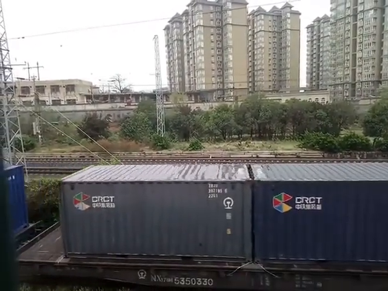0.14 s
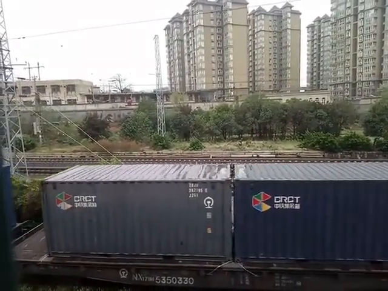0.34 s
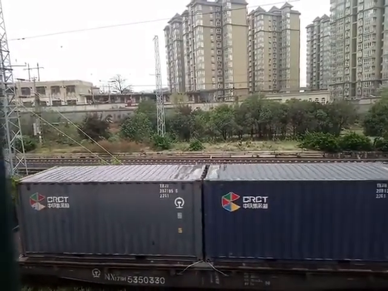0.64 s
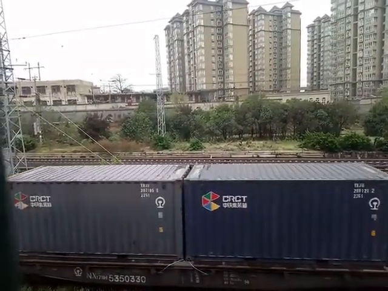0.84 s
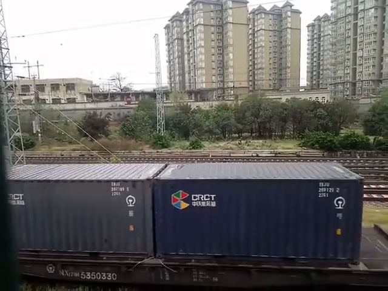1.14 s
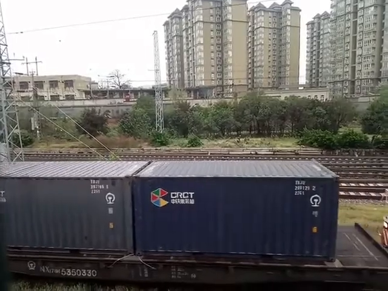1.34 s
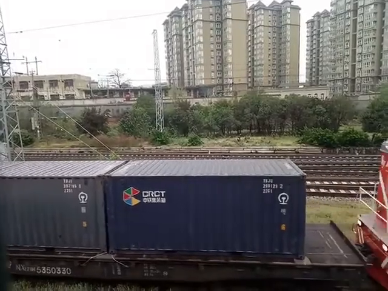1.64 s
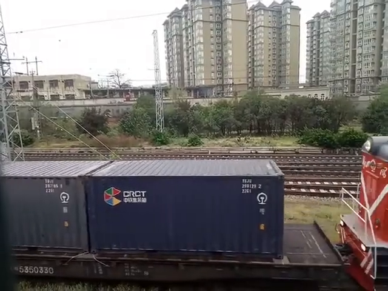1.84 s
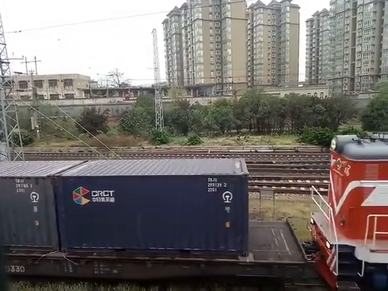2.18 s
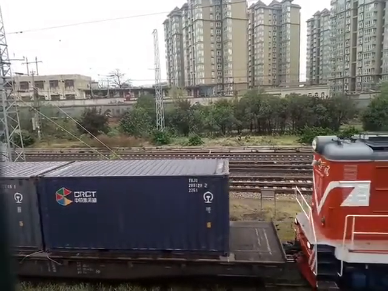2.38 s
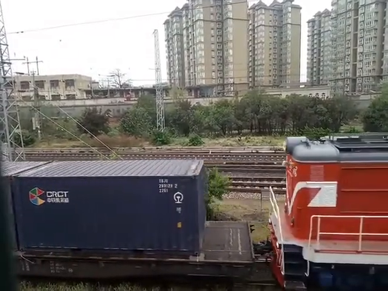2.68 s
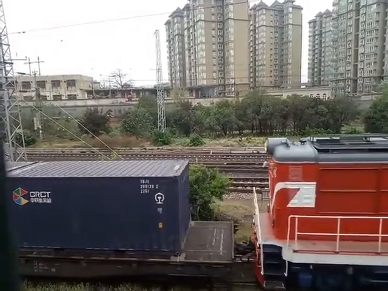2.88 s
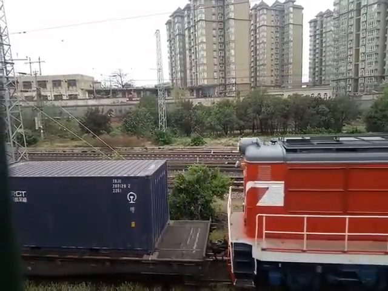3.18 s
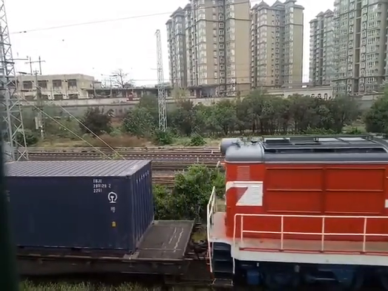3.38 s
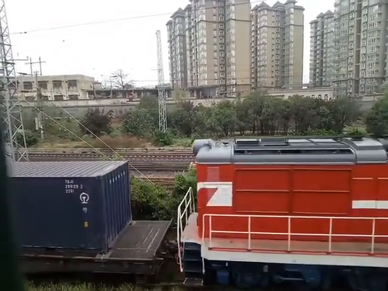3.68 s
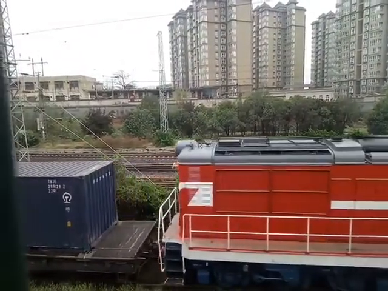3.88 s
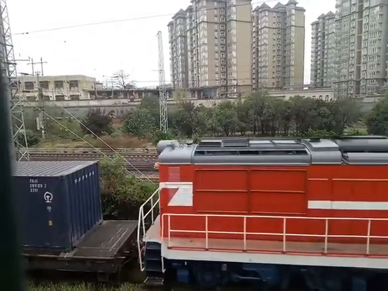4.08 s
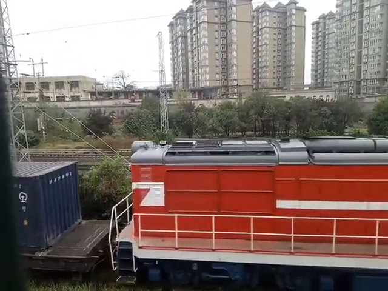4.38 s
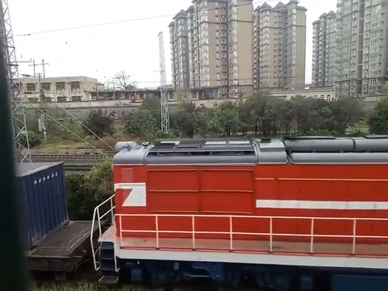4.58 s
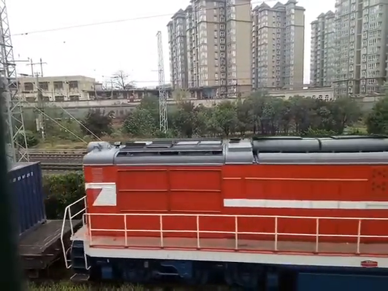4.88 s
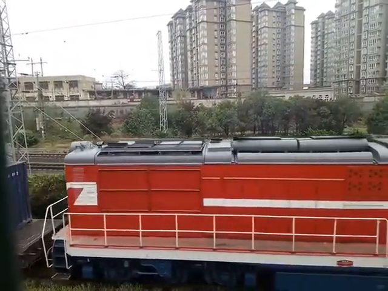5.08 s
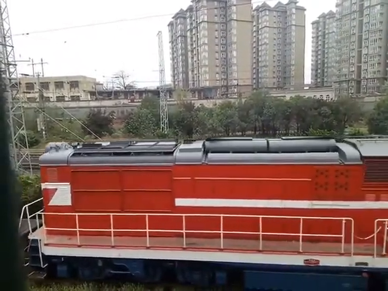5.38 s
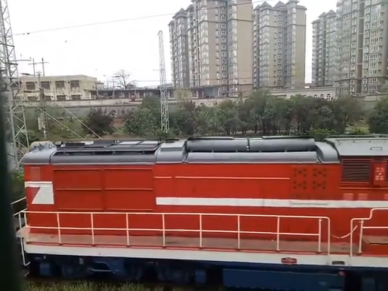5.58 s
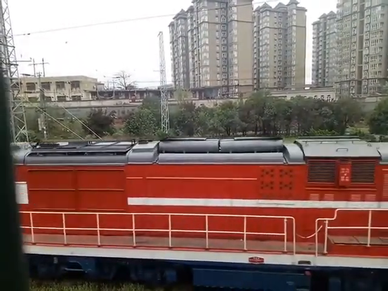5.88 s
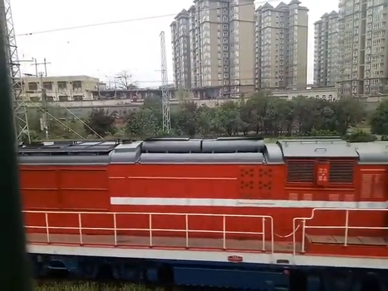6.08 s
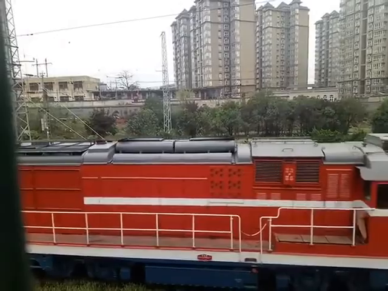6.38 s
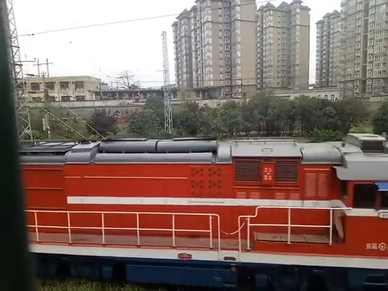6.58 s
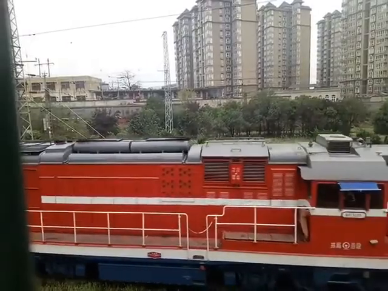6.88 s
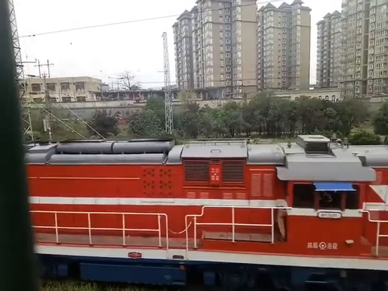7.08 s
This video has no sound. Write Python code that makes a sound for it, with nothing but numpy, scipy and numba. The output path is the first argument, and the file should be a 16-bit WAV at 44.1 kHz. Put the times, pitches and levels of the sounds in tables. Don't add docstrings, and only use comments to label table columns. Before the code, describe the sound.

From 0 s a diesel engine drones steadily nearby in an open railway yard, its rapid uneven exhaust beats throbbing about five times a second over low rolling wheel rumble. A thin, high turbocharger whistle flutters and beats continuously, with a swelling low gear hum, faint fan hum, valve clatter and ringing sheet metal. Rumble lifts around 1.6 s as a bogie passes. At about 2.9 s a coupling takes up slack with a soft scraping clank and short metallic ring. The engine comes abreast by about 5.1 s; the rumble swells there and near 6 s, while fan hum, upper whistle and exhaust hiss become clearer towards 7 s. Around 7.1 s a low horn begins and is cut short. The close phone pickup is slightly overloaded, with patchy, band-limited treble; the right channel is duller and more diffuse.

```python
import sys
import numpy as np
from scipy import signal
from scipy.fft import rfft, irfft
from scipy.io import wavfile
from scipy.ndimage import uniform_filter1d
from numba import njit

SR = 44100
rng = np.random.default_rng(int(sys.argv[2]) if len(sys.argv) > 2 else 0)


def materialize(psi):
    bounded = np.clip(np.atleast_2d(psi).T, -1, 1)
    quanta = np.round(bounded * 32767).astype(np.int16)
    wavfile.write(sys.argv[1], SR, quanta)


def volts(x):
    e = np.asarray(x, float) / 20
    return 10 ** e


N = 319284
TIME = np.arange(N) / SR
BINS = np.maximum(np.arange(N // 2 + 1) * SR / N, 1)


def curves(table):
    s, *columns = np.transpose(table)
    return [np.interp(TIME, s, c) for c in columns]


def over_hz(table):
    hz, value = np.transpose(table)
    return np.interp(np.log(BINS), np.log(hz), value)


def swells(table):
    return sum(lift_db * np.exp(-((TIME - s) / half_s) ** 2) for s, half_s, lift_db in table)


def between(pair, share):
    return pair[0] + share * (pair[1] - pair[0])


def unit(x):
    return x / np.sqrt(np.mean(x ** 2))


def walk(rate_hz):
    k = int(SR / rate_hz)
    held = np.repeat(rng.standard_normal(N // k + 1), k)
    return 1.3 * uniform_filter1d(uniform_filter1d(held, k), k)[:N]


def tone(hz, blur_hz, blur_rate, flicker_db):
    turns = np.cumsum(hz + blur_hz * walk(blur_rate)) / SR + rng.random()
    return np.sqrt(2) * volts(flicker_db * walk(blur_rate)) * np.sin(2 * np.pi * turns)


def noise(colour, flicker_db, rate):
    spectrum = rfft(rng.standard_normal(N)) * volts(over_hz(colour))
    place = 2 * np.log2(BINS)
    first, last = int(2 * np.log2(colour[0][0])), int(2 * np.log2(colour[-1][0])) + 1
    out = 0
    for k in range(first, last + 1):
        window = np.cos(np.clip(place - k, -1, 1) * np.pi / 2)
        out = out + volts(flicker_db * walk(rate)) * irfft(spectrum * window ** 2, N)
    return unit(out)


@njit
def band(x, hz, width):
    y, b, l = np.empty(len(x)), 0., 0.
    for i in range(len(x)):
        g, k = np.tan(np.pi * hz[i] / SR), width / hz[i]
        v = (b + g * (x[i] - l)) / (1 + g * (g + k))
        b, l, y[i] = 2 * v - b, l + 2 * g * v, k * v
    return y


# [f/Hz, level/dB]
RUMBLE = [(18, -8.5), (28, -17), (38, -32), (55, -12), (85, -9.5), (130, -8), (200, -3.5), (240, -7),
          (300, -7.5), (420, -13.5), (560, -27.5), (900, -49.5)]
# [t/s, half length/s, lift/dB]
BOGIES = [(1.6, 0.42, 2), (2.8, 0.21, -0.5), (5.1, 0.32, 1.5), (6.0, 0.15, 3), (6.8, 0.42, -1)]


def wheels():
    return volts(-19 + swells(BOGIES)) * noise(RUMBLE, flicker_db=1.7, rate=4.7)


# [f/Hz, level/dB]
HISS_COLOUR = [(2800, -15.5), (3150, 0.5), (3800, 5.5), (4100, 4), (4500, 3), (5200, 2), (5600, -0.5),
               (6500, 3.5), (6900, -4.5), (7150, -18), (8000, -24.5), (8700, -19), (9500, -27), (9700, -92)]


def hiss(stack, throb_db):
    return volts(between((-39, -34), stack) + 1.1 * throb_db) * noise(HISS_COLOUR, flicker_db=0.7, rate=14)


# [t/s, f/Hz, depth/0-1]
GROUND_NOTCH = [(0, 5870, 0.7), (.7, 5800, 0.8), (1.4, 5610, .75), (1.7, 5390, 0.2), (1.95, 5710, 0.6),
                (2.4, 5450, 0.4), (2.8, 5530, .6), (3.2, 5730, 0.95), (3.6, 5530, 0.9), (4.0, 5770, 0.6),
                (4.25, 5440, 0.6), (4.55, 5620, 0.5), (4.75, 5470, .8), (5.05, 5230, .6), (5.5, 5630, 0.1),
                (6.1, 5930, .55), (6.35, 5730, 0.01), (6.6, 5640, .75)]
# [f approaching/Hz, f abreast/Hz, width/Hz, depth far/0-1, depth near/0-1]
DIM_BANDS = [(6420, 6460, 190, 0.7, 0.12)]


def notched(sound, abreast, stack):
    hz, depth = curves(GROUND_NOTCH)
    sound = sound - np.clip(depth, 0, 1) * band(sound, hz * (1 + 0.028 * walk(9)), 600.)
    for far_hz, near_hz, width_hz, far, near in DIM_BANDS:
        hz = between((far_hz, near_hz), abreast) * (1 + 0.0068 * walk(3.2))
        depth = np.clip(between((far, near), stack), 0, 1)
        sound = sound - depth * band(sound, hz, 1. * width_hz)
    return sound


# [t/s, f/Hz]
GEAR_HZ = [(0, 236.2), (1.5, 239.7), (4, 243.1), (5.8, 246.2), (7.24, 245.8)]
# [t/s, half length/s, lift/dB]
GEAR_SWELLS = [(1.1, 0.45, 10), (1.6, 0.22, 5.5), (1.87, .07, -9.5), (2.1, 0.33, 12.5), (2.45, 0.042, -5.5),
               (2.65, 0.11, 3), (2.95, 0.34, 14), (3.75, 0.32, 12.5), (4.4, 0.29, 6.5), (5.75, 0.22, 10),
               (6.4, 0.44, 9), (6.95, .2, -4.5), (5.0, .3, -5), (.5, 0.27, -1.5)]


def gear():
    hum = tone(curves(GEAR_HZ)[0], blur_hz=0.3, blur_rate=5, flicker_db=0.5)
    return volts(-33.5 + swells(GEAR_SWELLS)) * hum


# [t/s, f/Hz]
FAN_HZ = [(0, 1144), (3.5, 1147), (5.5, 1145), (7.24, 1140)]
# [t/s, half length/s, lift/dB]
FAN_SWELLS = [(.08, .15, 3), (.5, .15, 3.5), (.75, 0.2, -5), (1.3, 0.075, 4.5), (1.8, .1, 1),
              (2.35, .06, 8), (2.95, .06, 3.5), (3.25, 0.055, 7), (3.65, .25, 8), (4.3, .2, 12),
              (4.85, 0.25, 10.5), (5.15, 0.11, 19), (5.5, .15, 11.5), (5.95, .08, 4.5), (6.15, .06, 11.5),
              (6.45, .15, 9), (6.75, 0.14, 12.5), (7.13, .1, 11.5)]


def fan():
    hum = tone(curves(FAN_HZ)[0], blur_hz=.8, blur_rate=12, flicker_db=1.0)
    return volts(-53.5 + swells(FAN_SWELLS)) * hum


# [f approaching/Hz, f abreast/Hz, width/Hz, level approaching/dB, level abreast/dB]
PANELS = [(2250, 2102, 270, -40, -37), (6120, 6150, 150, -47, -52.5), (1304, 1335, 23, -56, -52)]


def panels(abreast, throb_db):
    out = 0
    for far_hz, near_hz, width_hz, far_db, near_db in PANELS:
        hz = between((far_hz, near_hz), abreast)
        ring = band(band(rng.standard_normal(N), hz, 1. * width_hz), hz, 2. * width_hz)
        out = out + unit(ring) * volts(between((far_db, near_db), abreast) + throb_db + 1.9 * walk(9))
    return out


# [f/Hz, level/dB]
CLATTER_COLOUR = [(350, -26), (570, -4), (750, 0.5), (940, 1.5), (1080, -4), (1700, -12), (2700, -12.5),
                  (3100, -16), (3600, -31.5)]
# [t/s, half length/s, lift/dB]
SURGES = [(.1, 0.035, 0), (.5, .05, 4), (1.3, 0.054, 1), (2.4, 0.081, 3.5), (2.95, 0.044, 3),
          (3.3, 0.085, 0.5), (4.05, 0.045, 3), (4.4, .06, 1.5), (4.65, 0.06, 0.5), (5.15, 0.041, 1.5),
          (5.95, 0.054, 2.5), (6.25, 0.086, 1.5), (6.55, 0.062, 1)]


def clatter(abreast, throb_db):
    db = between((-31, -29.5), abreast) + .8 * throb_db + swells(SURGES) + 0.73 * walk(7)
    return volts(db) * noise(CLATTER_COLOUR, flicker_db=1.0, rate=9)


# [f/Hz, level/dB, t60/s]
CLANK_MODES = [(1153, -32, 0.56), (2100, -43, 0.15), (2460, -34, 0.32), (2850, -43.5, 0.13),
               (4500, -44, 0.097)]


def clank():
    age = np.maximum(TIME - 2.92, 0)
    push = 1 - np.exp(-age / 0.037)
    scrape = unit(band(rng.standard_normal(N), np.full(N, 2200.), 3200.)) * volts(-34 - 60 * age / 0.32)
    ring = sum(2 * volts(db - 60 * age / t60_s) * np.sin(2 * np.pi * hz * age) for hz, db, t60_s in CLANK_MODES)
    return push * (scrape + ring)


# [multiple of the pitch, level/dB]
HORN_PARTIALS = [(1, 0.5), (2, -14.5), (3, -19), (4, -17), (5, -19), (6, -19.5), (7, -15.5), (8, -21.5),
                 (9, -34.5)]


def horn():
    age = np.maximum(TIME - 7.14, 0)
    turns = np.cumsum(327 * (1 - 0.022 * np.exp(-age / 0.027))) / SR
    swell = 1 - np.exp(-(age / 0.031) ** 2)
    out = 0
    for k, db in HORN_PARTIALS:
        out = out + np.sqrt(2) * volts(db) * np.sin(2 * np.pi * (k * turns + rng.random()))
    return volts(-22.5) * swell * out


# [t/s, f/Hz]
TURBO_HZ = [(0, 3335), (.8, 3345), (1.6, 3354), (2.4, 3364), (3.2, 3368), (4, 3374), (4.8, 3374),
            (5.6, 3371), (6.4, 3368), (7.24, 3363)]
# [t/s, level/dB, echo share/0-1]
TURBO_SECOND = [(0.0, -37, 0.4), (0.54, -40.5, 0.8), (0.64, -33.5, 0.5), (2.78, -36.5, .5),
                (2.85, -42.5, 1), (2.95, -38, 0.4), (3.6, -34, 0.2), (4.32, -31.5, 0.3), (4.38, -39.5, .7),
                (5.0, -37.5, 0.7), (5.12, -44, 0.5), (5.36, -32, 0.4), (6.1, -42.5, 0.5),
                (6.33, -37.5, 0.6), (6.43, -42, 0.2), (6.53, -30, 0.6), (7.0, -38, 0.6), (7.1, -32, .15)]
# [t/s, half length/s, lift/dB]
TURBO_FLUTTER = [(.4, .08, -2), (.72, 0.019, -10.5), (.81, .015, -13), (.9, 0.013, -11.5), (1.07, .025, -6),
                 (1.16, .015, -3), (1.85, 0.025, -1.5), (2.39, .015, -9.5), (1.52, 0.1, -1),
                 (1.92, .06, -2.5), (2.32, 0.026, -3), (2.52, 0.035, 2), (2.62, 0.033, -5), (2.97, .04, 3),
                 (3.22, .05, 1), (4.02, 0.026, -2), (4.1, 0.043, 3), (4.6, 0.084, -4), (4.82, 0.039, -2),
                 (5.52, 0.034, -6), (5.62, 0.043, 2.5), (5.72, 0.054, -2), (5.8, 0.027, 7.5),
                 (5.9, 0.042, -0.5), (6.17, 0.039, 5.5), (6.77, 0.03, -4), (6.9, 0.044, -9),
                 (3.27, .04, -6), (2.9, .04, -4.5), (4.92, .08, 2.5), (5.13, 0.04, 0.5), (6.57, .04, -7),
                 (1.0, 0.025, 0.5), (1.6, 0.05, 0.5), (.12, 0.033, 0.5), (.32, 0.077, -1), (2.57, 0.036, 3),
                 (5.47, .04, 0.5), (4.4, 0.037, -1)]
# [t/s, half length/s, lift/dB]
TURBO_SWELLS = [(4.65, 0.16, 6), (4.2, 0.14, -6.5), (5.02, .05, -1.5), (5.3, 0.095, -0.5),
                (5.3, 0.028, -3.5), (6.12, .04, 5), (7.2, 0.05, -0.5), (8.4, 0.036, 3.5),
                (6.43, 0.035, -2.5), (6.53, 0.069, 4), (6.85, 0.14, 3), (7.05, .05, -2), (3, 0.096, 2),
                (5.7, 0.053, 2.5), (5.7, 0.12, -2.5), (5.55, .1, -4), (4.0, .3, 1), (5.8, .1, -4),
                (5.95, .05, -7), (6.3, .1, 0), (8.4, .1, 1.5)]
# [level stack far/dB, level stack near/dB]
TURBO_UPPER_DB = [(-54.5, -38.5), (-50.5, -40), (-68.5, -63)]


def turbo(stack, throb_db):
    echo_hz = 10.5
    second_hz = curves(TURBO_HZ)[0]
    second_db, echo = curves(TURBO_SECOND)
    echo = np.clip(echo, 0, 1)
    levels = [second_db + swells(TURBO_FLUTTER)] + [between(pair, stack) for pair in TURBO_UPPER_DB]
    levels[1] = levels[1] + swells(TURBO_SWELLS)
    out = 0
    for k, db in enumerate(levels):
        partial = k + 2
        hz = second_hz * partial / 2
        width_hz = 15.0 * partial
        skirt = unit(band(band(rng.standard_normal(N), hz, width_hz), hz, 6.6 * width_hz))
        line = tone(hz, blur_hz=1.6 * partial, blur_rate=30, flicker_db=0.85)
        echoed = tone(hz - echo_hz * partial / 2, blur_hz=1.1 * partial, blur_rate=6, flicker_db=1.0)
        beating = (line + echo * echoed) / np.sqrt(1 + echo ** 2)
        skirt_share = 0.12 + 0.088 * k + 0.6 * echo
        out = out + volts(db + 2.5 + 0.6 * throb_db) * (beating + skirt_share * skirt)
    return out


CYLINDER_DB = [-0.77, -0.2, -2, 1.6, 1.95, 1.23, 0.76, -0.17, -0.3, 0, 0.61, -.5]


def throb(cycle):
    count = len(CYLINDER_DB)
    return np.interp(cycle * count % count, np.arange(count) + .5, CYLINDER_DB, period=count)


# [stroke, t/s, half length/s, lift/dB]
HARD_POPS = [(4, 4.6, 3.9, 9.5), (3, 1.8, 1.2, 4.5), (3, 5.5, 0.38, 7), (5, 1.4, 0.62, 9),
             (8, 5.6, 0.33, 0.5)]


def pops(cycle):
    count = len(CYLINDER_DB)
    stroke = np.floor(cycle * count).astype(int)
    late = .4 + rng.random(count) * .1
    scatter_db = 2.0 * rng.standard_normal(stroke[-1] + 1)
    fired = np.diff((cycle * count % 1 > late[stroke % count]) * 1., prepend=1) > 0
    hard_db = sum((stroke % count == k) * swells([row]) for k, *row in HARD_POPS)
    pulses = fired * volts(scatter_db[stroke] + hard_db)
    pipe_hz = np.full(N, 290.)
    return volts(-30.5 + swells(BOGIES)) * unit(band(band(pulses, pipe_hz, 200.0), pipe_hz, 230.0))


# [multiple of the cycle, level approaching/dB, level abreast/dB]
EXHAUST_TONES = [(7, -49, -45), (8, -48, -47), (9, -26, -30), (10, -46, -47), (11, -40, -41),
                 (12, -31, -21), (13, -40, -37), (14, -35, -36), (16, -39, -39), (17, -40, -38),
                 (18, -37, -38), (19, -32, -35), (20, -40, -38), (21, -35, -32), (22, -43, -41),
                 (23, -31, -27), (24, -30, -22), (25, -32, -30), (26, -35, -33), (27, -31, -33),
                 (28, -29, -27), (29, -38, -39), (30, -33, -37), (31, -39, -34), (32, -32, -32),
                 (33, -34, -32), (34, -33, -36), (35, -32, -29), (36, -43, -35), (40, -41, -33)]
# [multiple of the cycle, t/s, half length/s, lift/dB]
EXHAUST_SWELLS = [(9, 0.71, 0.18, -9.5), (9, 3.4, 1.3, 4.5), (9, 5.9, 0.15, -4), (9, 1.3, .3, -0.5),
                  (9, 4.5, 0.091, -9), (9, 4.6, 0.57, 2), (12, 0.42, 0.11, -2.5), (12, 2.7, 0.48, -5),
                  (21, 0.3, 1.1, 11), (21, 4.9, 0.97, 8), (23, 4.6, 0.66, 3.5), (24, 0.42, 0.29, -12.5),
                  (24, 3.8, 0.35, 5), (24, 4.95, 0.51, -4.5), (24, 6.7, 1.2, 5.5), (24, 7.1, 0.54, -8),
                  (25, 4.1, 1.1, 5), (26, 4.5, 0.23, 5), (25, 14, 0.49, -1), (26, 3.6, .5, -1),
                  (26, 2.2, .5, 0), (27, 3, 1.8, 5), (27, 2.4, 0.11, 6), (27, 4.8, 0.65, 5.5),
                  (21, 1.8, 0.62, -6), (21, 6.2, 0.36, -0.5), (23, 2.7, 1.2, 3.5), (23, 6.8, 0.73, -4.5),
                  (23, 5.3, .3, -4), (28, 0.33, .4, -7), (28, 5.8, 0.19, -6.5), (35, 1.7, 0.15, 6),
                  (35, 8.1, 0.63, 0), (29, 2.5, 2, 7.5), (30, 0.49, 0.35, 5), (35, 0.44, 0.5, -9),
                  (28, 7, 0.49, -7.5), (33, 7.5, .2, 10.5), (27, 1.9, 0.36, 1), (28, 3.2, 1.1, 4.5),
                  (28, 4.6, 0.49, 3), (32, 6.9, 0.64, 9), (32, 3.1, 0.25, -2.5), (32, 2.1, 0.53, -10.5),
                  (32, 9, 0.16, -11), (40, 2.6, 0.27, 5), (24, 1.9, 0.73, 3), (9, 6.9, .4, -5.5),
                  (9, 7.6, 0.45, 6), (12, 7.1, .4, -1), (18, 6.9, 0.62, 9.5), (18, 6.4, .5, -7),
                  (35, 1.5, 0.31, 4.5), (35, 4.3, 0.19, -14)]
# [t/s, strength ratio]
SECOND_STROKE = [(0, 1.2), (1.5, 0.99), (3.2, 0.97), (4, 1.2), (6.5, 1.2), (7.24, 0.94)]


def exhaust(cycle, abreast):
    first_turn, second_turn = .83, .07
    loose_turns, sag_turns = .15, .01
    out, second = 0, curves(SECOND_STROKE)[0]
    for k, far_db, near_db in EXHAUST_TONES:
        lifts = [row[1:] for row in EXHAUST_SWELLS if row[0] == k]
        db = between((far_db, near_db), abreast) + (swells(lifts) if lifts else 1.5 * walk(1.5))
        start, sway = rng.random(), 0.04 * walk(3.5)
        if k < 17:
            wave = np.sin(2 * np.pi * (k * cycle + start + sway))
        else:
            pair = np.exp(-2j * np.pi * k * first_turn) + second * np.exp(-2j * np.pi * k * second_turn)
            pull = pair / np.sqrt(np.abs(pair) ** 2 + 1 / 100)
            turns = k * cycle + sag_turns * (k - 24) ** 2 / 2 + loose_turns * start + sway
            wave = np.imag(pull * np.exp(2j * np.pi * turns))
        out = out + np.sqrt(2) * volts(db) * wave
    return out


# [f/Hz, level/dB]
PORT_DB = [(60, 0), (180, .4), (320, 1), (550, 2), (970, 5), (1680, 10.5), (2940, 18), (5120, 23),
           (6500, 28), (8920, 26)]
# [f/Hz, likeness/0-1]
PORT_ALIKE = [(60, .9995), (130, .993), (250, .975), (390, .93), (520, .7), (800, .77), (1050, .55),
              (1400, .35), (2200, .2), (3500, .1)]
# [t/s, lag/samples]
PORT_LAG = [(0, 14), (2.5, 13), (3.5, 7), (5.5, 0), (7.24, -6)]


def ports(sound):
    tail_s = np.arange(int(.3 * SR)) / SR
    tail = unit(rng.standard_normal(len(tail_s)) * np.exp(-tail_s / 0.14)) / np.sqrt(len(tail_s))
    scattered = signal.fftconvolve(sound, tail)[:N]
    late = np.interp(np.arange(N) - curves(PORT_LAG)[0], np.arange(N), sound)
    alike, muffle = np.clip(over_hz(PORT_ALIKE), 0, 1), volts(-over_hz(PORT_DB))
    both = 2 / np.sqrt(1 + muffle ** 2 + 2 * alike * muffle)
    right = muffle * (alike * rfft(late) + np.sqrt(1 - alike ** 2) * rfft(scattered))
    return np.array([irfft(both * rfft(sound), N), irfft(both * right, N)])


# [t/s, cycle rate/Hz]
CYCLE_HZ = [(0.0, 5.242), (1.81, 5.288), (3.62, 5.292), (5.43, 5.283), (7.24, 5.288)]


def scene():
    cycle = np.cumsum(curves(CYCLE_HZ)[0]) / SR
    abreast = np.clip((TIME - 2.0) / 3.14, 0, 1)
    stack = np.clip((TIME - 2.2) / (7.0 - 2.2), 0, 1) ** 1.5
    throb_db = throb(cycle)
    mix = wheels() + notched(hiss(stack, throb_db), abreast, stack) + gear() + fan()
    mix = mix + panels(abreast, throb_db) + clatter(abreast, throb_db) + clank() + horn()
    mix = mix + turbo(stack, throb_db) + pops(cycle) + exhaust(cycle, abreast)
    return ports(mix)


# [f/Hz, level/dB]
MASK = [(300, -22), (1000, -8), (1600, 1), (2200, 1), (2700, 5), (2950, 9.5), (3300, -8), (3650, 7.5),
        (4400, 6.8), (4900, 4), (5300, 7), (5500, 8), (6000, 5), (6600, 5.5), (7200, 17), (7900, 23),
        (8600, 22), (9300, 22)]
EDGES = [0, 8, 16, 24, 32, 40, 48, 56, 64, 72, 80, 88, 96, 108, 120, 132, 144, 160, 176, 196, 216, 240, 264,
         292, 320, 352, 384, 416, 448]
# [t/s, level/dB]
SPARE = [(0.0947, -67), (0.3456, -66), (0.608, -57), (0.7307, -65), (1.0256, -60), (1.1817, -63),
         (1.2441, -63), (1.4351, -63), (1.6043, -59), (1.716, -61), (2.0328, -61), (2.1031, -62),
         (2.5865, -56), (2.9751, -57), (3.2735, -56), (3.7194, -66), (3.8297, -58), (3.9504, -69),
         (4.0851, -62), (4.1475, -54), (4.2288, -58), (4.3166, -59), (4.3909, -57), (4.4478, -56),
         (4.5306, -59), (4.6389, -57), (4.6773, -56), (4.8299, -54), (5.0843, -61), (5.1542, -54),
         (5.3168, -65), (5.5273, -63), (5.6231, -58), (6.0142, -60), (6.129, -55), (6.2776, -58),
         (6.5331, -51), (6.7471, -57), (6.9222, -51), (7.1776, -55)]
# [t/s, half length/s, lift/dB]
TOP_OPEN = [(.42, .33, 4.5), (2.43, .07, 4), (3.53, .05, 5), (4.5, .5, 2), (5.12, .18, 6), (5.6, .13, 4),
            (5.9, .04, 5), (6.35, .35, 6.5), (7.0, .27, 7)]


def starve(sound):
    count, patchy_db, spare_db, covered_db = 1024, 2.9, 3.6, 4.5
    n = np.arange(2 * count) + .5
    window = np.sin(np.pi * n / (2 * count))[:, None]
    basis = window * np.cos(np.pi / count * np.outer(n + count / 2, n[:count])) * np.sqrt(2 / count)
    blocks = np.pad(sound, ((0, 0), (count, 2 * count - N % count))).reshape(2, -1, count)
    lines = np.concatenate([blocks[:, :-1], blocks[:, 1:]], axis=2) @ basis
    widths = np.diff(EDGES + [count])
    power = np.add.reduceat(lines ** 2, EDGES, axis=2) / widths + 1e-18
    mean = np.mean(power, axis=1, keepdims=True) ** .25 * uniform_filter1d(power, size=43, axis=1) ** .25
    hz = (np.array(EDGES) + widths / 2) * SR / 2 / count
    patches = uniform_filter1d(rng.standard_normal(lines.shape[:2] + hz.shape), size=3, axis=1)
    step_db = np.interp(hz, *np.transpose(MASK)) + patchy_db * patches
    frame_s = np.arange(lines.shape[1]) * count / SR
    more = [(.65, -55), (2.37, -55), (2.74, -58), (3.1, -57), (3.76, -57), (7.07, -56)]  # [t/s, level/dB]
    spare = 0
    for s, db in SPARE + more:
        spare = spare + volts((db + 58) / 2) * np.exp(-((frame_s - s - .02) / .015) ** 2)
    relief = 3.1 * spare + .2 * rng.exponential(size=lines.shape[1])
    top_share = np.interp(hz, [6800, 6900, 7300, 8100, 8300], [0, .8, .6, .6, 1.15])
    step_db = step_db - spare_db * relief[:, None] * top_share
    luck = rng.exponential(size=lines.shape[1:2] + hz.shape)
    step_db = step_db - luck * np.interp(hz, [6800, 7200, 7900, 8300], [0, 1.5, 3.4, 0])
    open_db = sum(db * np.exp(-((frame_s - s) / half_s) ** 4) for s, half_s, db in TOP_OPEN)
    step_db = step_db - open_db[:, None] * (np.abs(hz - 8600) < 200)
    step_db = step_db + np.array([0, covered_db])[:, None, None] * np.clip(hz / 2800, 0, 1) ** 2
    step = np.repeat(mean * volts(step_db), widths, axis=2)
    frames = (np.sign(lines) * np.floor(np.abs(lines) / step + .4054) * step) @ basis.T
    return (frames[:, :-1, count:] + frames[:, 1:, :count]).reshape(2, -1)[:, :N]


def band_limit(x):
    return signal.sosfilt(signal.butter(12, 9520, fs=SR, output="sos"), x)


def record(dry):
    bent = np.tanh(.7 * dry) / .7
    return band_limit(starve(bent))


dry = scene()
out = record(dry)
materialize(out)
```